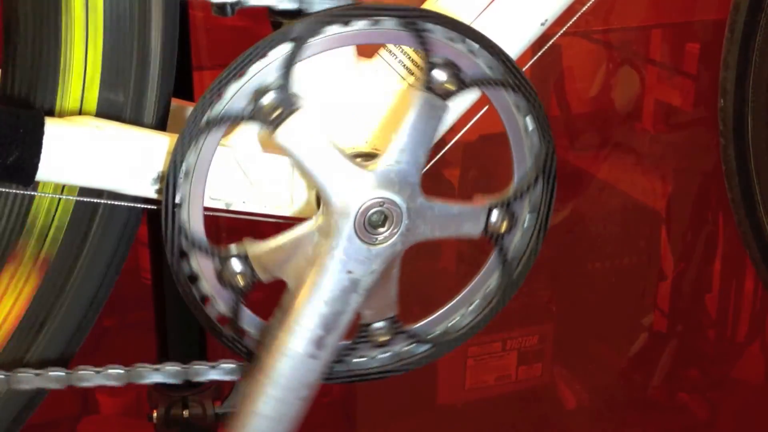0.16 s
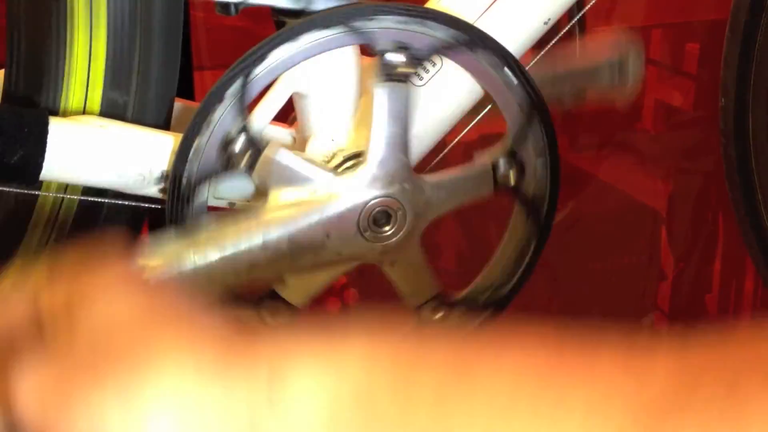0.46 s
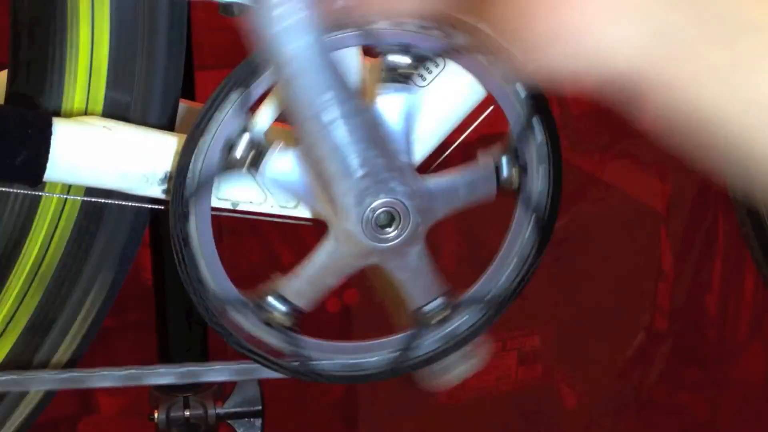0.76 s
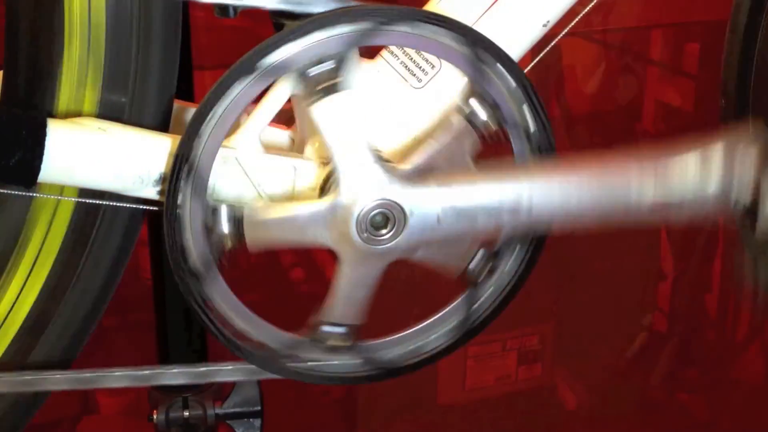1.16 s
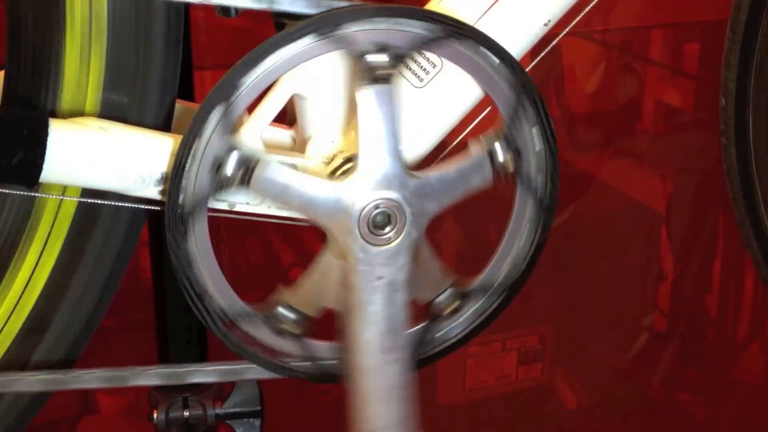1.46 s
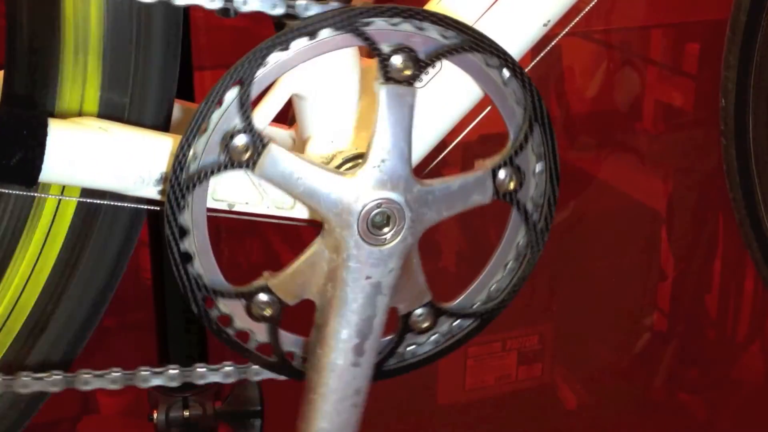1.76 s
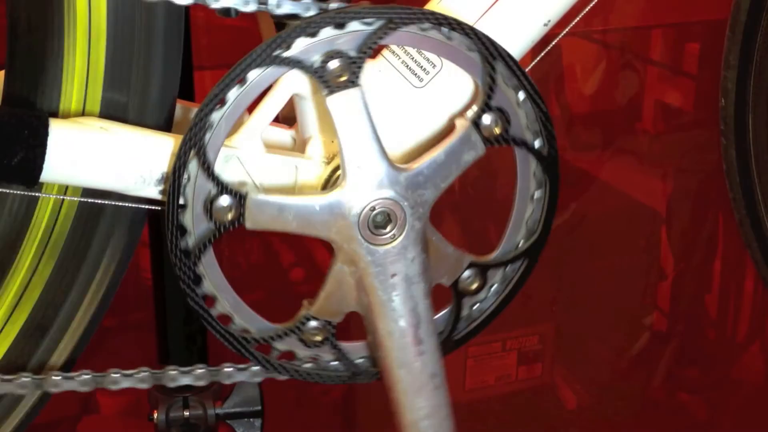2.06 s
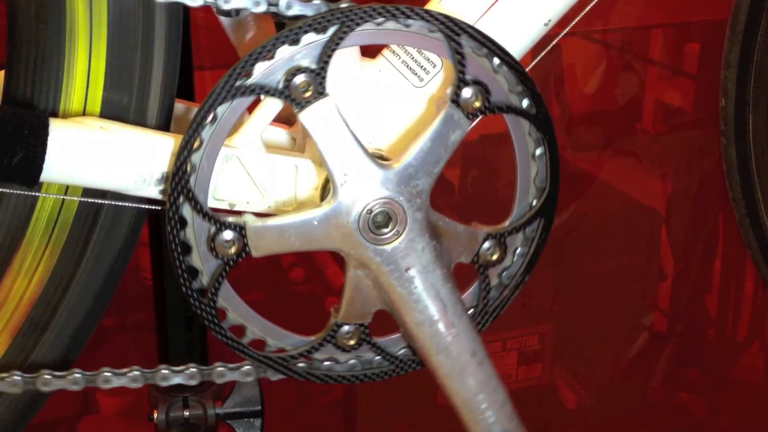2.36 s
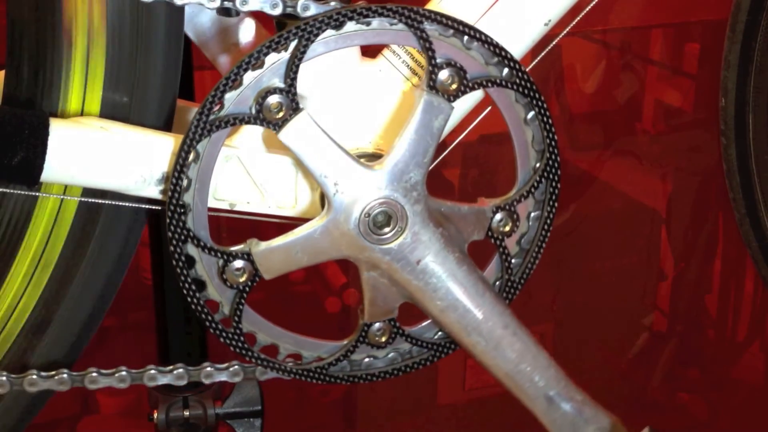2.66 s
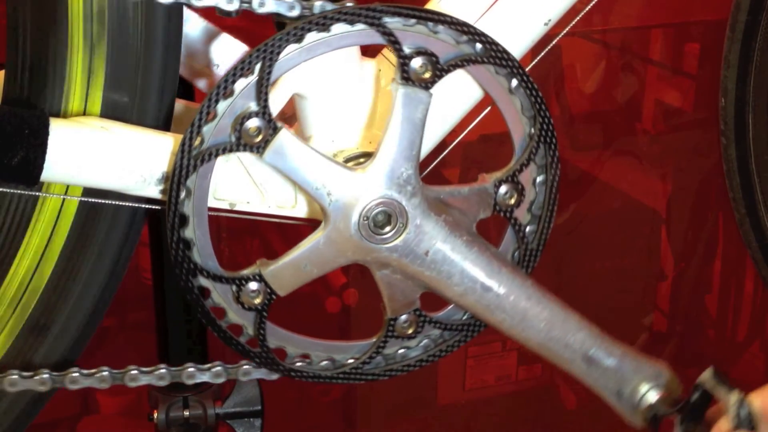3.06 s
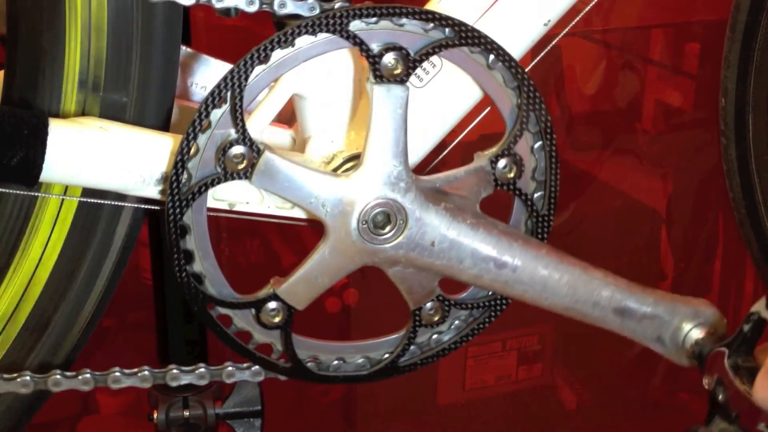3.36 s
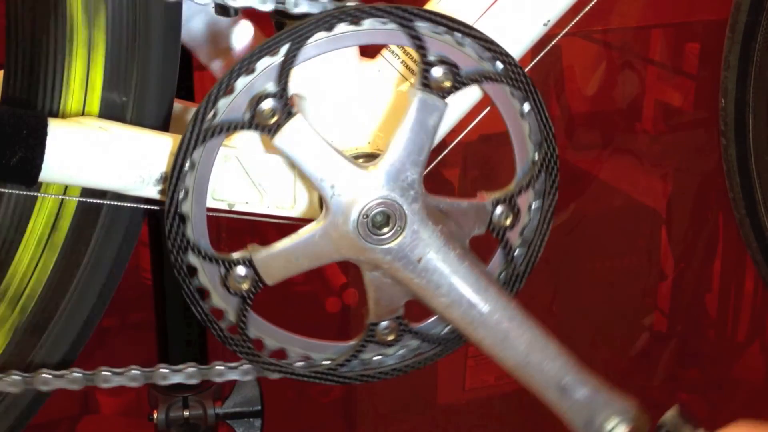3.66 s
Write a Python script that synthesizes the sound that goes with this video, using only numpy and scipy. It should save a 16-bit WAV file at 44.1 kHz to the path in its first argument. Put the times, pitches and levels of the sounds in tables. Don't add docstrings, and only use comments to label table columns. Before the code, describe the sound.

A bicycle freewheel clicks crisply: first a hand turns the crank with soft chain hiss and small ticks, then the coasting wheel's ratchet clicks steadily, slows and stops. Close microphone, small room, faint ventilation rumble.

```python
import sys
import numpy as np
from scipy import signal
from scipy.fft import rfft, irfft
from scipy.io import wavfile
from scipy.ndimage import uniform_filter1d, map_coordinates

SR = 44100
rng = np.random.default_rng(int(sys.argv[2]) if len(sys.argv) > 2 else 0)


def attenuation_scalar(level_db):
    decades = np.asarray(level_db, float) / 20
    return 10 ** decades


def generate_wav(sig):
    pcm = np.round(np.clip(np.atleast_2d(sig).T, -1, 1) * 32767).astype(np.int16)
    wavfile.write(sys.argv[1], SR, pcm)


N = 167580


def unit(x):
    return x / np.sqrt(np.mean(x ** 2, -1, keepdims=True) + 1e-20)


def along(points, hz):
    f, v = np.transpose(points)
    return np.interp(np.log(hz + 1), np.log(f + 1), v)


def noise(spectrum, rows, size, scatter_db=0):
    hz = np.fft.rfftfreq(size, 1 / SR)
    humps = rng.standard_normal((rows, len(hz)))
    humps = unit(uniform_filter1d(humps, size=len(hz) // 30, axis=1))
    gain = attenuation_scalar(along(spectrum, hz) + scatter_db * humps)
    return unit(irfft(rfft(rng.standard_normal((rows, size))) * gain, size))


def narrow(hz, width_hz):
    offset = (np.fft.rfftfreq(N, 1 / SR) - hz) / width_hz * 2
    return unit(irfft(rfft(rng.standard_normal(N)) / (1 + offset ** 2), N))


def wobble(rate_hz):
    knots = rng.standard_normal(int(N * rate_hz / SR) + 4)
    return map_coordinates(knots, [np.arange(N) * rate_hz / SR])


def lumps(shape, depth_db, size):
    return attenuation_scalar(depth_db * unit(uniform_filter1d(rng.standard_normal(shape), size=size, axis=-1)))


def place(times, sounds):
    at = np.round(np.asarray(times) * SR).astype(int)[:, None] + np.arange(sounds.shape[1])
    return np.bincount(at.ravel(), sounds.ravel(), N + SR)[:N]


CHATTER_DB, SNAP_RISE_S = 3.5, 0.0012


def bursts(spectrum, rows, t60, colour_db):
    t = np.arange(2048) / SR
    grit = noise(spectrum, rows, size=2048, scatter_db=colour_db)
    grit = unit(grit * lumps((rows, 2048), CHATTER_DB, size=30))
    return grit * attenuation_scalar(-60 * t / t60) * (1 - np.exp(-t / SNAP_RISE_S))


# f/Hz, width/Hz, level/dB
FAN_TONES = [(118.7, 8.2, -66), (175, 106, -61.5), (380.7, 4.8, -62.5)]
# f/Hz, level/dB
RUMBLE_SPECTRUM = [(60, -65), (85, -81), (110, -13), (194, 3), (350, -2), (420, -6.5), (700, -25.5),
                   (1000, -78)]
# f/Hz, level/dB
HISS_SPECTRUM = [(300, -6), (500, -1.5), (900, -4.5), (3100, -15), (8600, -18), (9600, -26.5), (11500, -20),
                 (15000, -20)]
RUMBLE_DB, HISS_DB = -50, -58


def room_tone():
    fan = sum(attenuation_scalar(db) * narrow(hz, width_hz) for hz, width_hz, db in FAN_TONES)
    rumble = attenuation_scalar(RUMBLE_DB + 0.8 * wobble(4.01)) * noise(RUMBLE_SPECTRUM, 1, size=N)[0]
    hiss = attenuation_scalar(HISS_DB) * noise(HISS_SPECTRUM, 1, size=N)[0]
    return fan + rumble + hiss


# t/s, length/s, level/dB, f/Hz
FRAME_SCRAPES = [
    (0.653, 0.1, -61.5, 1050),
    (0.827, 0.083, -59.5, 1400),
    (1.28, 0.029, -57, 2000),
    (1.353, 0.091, -60, 1570),
]


def scrapes():
    t = np.arange(N) / SR
    out = 0
    for s, length_s, db, hz in FRAME_SCRAPES:
        swell = np.exp(-((t - s) / length_s * 2) ** 2)
        out = out + attenuation_scalar(db) * swell * narrow(hz, 0.16 * hz)
    return out


# t/s, level/dB
EFFORT = [(0, -77), (.3, -70.5), (.64, -60), (.69, -55.5), (.95, -53.5), (1.15, -56.5), (1.35, -50.5),
          (1.46, -54), (1.51, -60)]
# f/Hz, level/dB
LINK_SPECTRUM = [(300, -57), (600, -2.5), (1400, -1.5), (3100, -8), (8800, -11), (9700, -24), (11500, -17),
                 (14700, -17)]
LINKS_PER_S, LINK_SCATTER_DB, LINK_T60_S, LINK_COLOUR_DB = 300, 8, 0.011, 4.5
LINK_DB, RUB_DB = -1, -2.5


def chain_hiss():
    s, effort_db = np.transpose(EFFORT + [(EFFORT[-1][0] + 0.054, -80)])
    times = rng.uniform(0, s[-1], int(LINKS_PER_S * s[-1]))
    sizes = attenuation_scalar(LINK_SCATTER_DB * rng.random((len(times), 1)) ** 2)
    links = place(times, sizes * bursts(LINK_SPECTRUM, len(times), LINK_T60_S, LINK_COLOUR_DB))
    links = links / np.sqrt(np.mean(links[:int(s[-1] * SR)] ** 2))
    rub = noise(LINK_SPECTRUM, 1, size=N)[0] * attenuation_scalar(0.68 * wobble(29.0))
    effort = attenuation_scalar(np.interp(np.arange(N) / SR, s, effort_db))
    return effort * (attenuation_scalar(LINK_DB) * links + attenuation_scalar(RUB_DB) * rub)


# t/s, peak/dB, f/Hz
CHAIN_TICKS = [(.1156, -37.5, 2600), (.177, -41, 2980), (0.2, -44, 3500), (.234, -55, 3000),
               (.2533, -36.5, 4760), (.31, -48, 3000), (.341, -46.5, 6100), (.358, -42, 4180),
               (.39, -37, 4540), (0.408, -41, 3000), (.4344, -45, 3500), (.449, -50, 5000),
               (.465, -45, 12000), (0.494, -44, 4500), (.519, -47, 7000), (0.533, -37.5, 5500),
               (.5965, -45, 5000), (0.613, -39, 3980), (.646, -47, 5000), (.666, -52, 7000),
               (.681, -32, 6990), (0.731, -40, 4200), (.752, -39, 3000), (.777, -39, 7500),
               (0.839, -34, 5500), (0.9018, -44, 6500), (0.93, -44, 5000), (0.9828, -29.5, 6500),
               (.994, -34, 7000), (1.037, -41, 6000), (1.048, -36, 5500), (1.076, -40, 6020),
               (1.1533, -41, 4000), (1.166, -38, 5000), (1.181, -43, 6000), (1.211, -37, 4835),
               (1.249, -43, 3000), (1.2755, -38, 6000), (1.303, -45, 6000), (1.345, -45, 6510),
               (1.396, -42, 7000), (1.41, -43, 6000)]
TICK_DB, TICK_T60_S, TICK_DB_PER_OCTAVE = -5.5, 0.018, -14
COLOUR_DB = 2.5


def chain_ticks():
    at, peak_db, tick_hz = np.transpose(CHAIN_TICKS)
    skirt_db = 3 * TICK_DB_PER_OCTAVE
    ticks = []
    for hz in tick_hz:
        peak = [(hz / 8, skirt_db), (hz, 0), (hz * 8, skirt_db)]
        ticks.append(bursts(peak, 1, TICK_T60_S, COLOUR_DB))
    return place(at, attenuation_scalar(peak_db + TICK_DB)[:, None] * np.concatenate(ticks))


# f/Hz, level/dB
SNAP_SPECTRUM = [(500, -19), (1600, -16), (2000, -8), (2800, -6.5), (5200, -9.5), (7000, 5), (10500, -3),
                 (14000, -0.5)]
SNAP_DB, SNAP_T60_S = -0.5, 0.036


def pawl_snaps(count):
    return attenuation_scalar(SNAP_DB) * bursts(SNAP_SPECTRUM, count, SNAP_T60_S, COLOUR_DB)


# f/Hz, level/dB, t60/s
WHEEL_MODES = [(917.4, -17, 0.1), (1980, -16, 0.24), (2066, -18.5, 0.16), (2710, -5, 0.074),
               (2985, -15.5, 0.19), (3300, -14, 0.039), (3710, -6.5, 0.085), (3858, -11.5, 0.14),
               (4270, -5.5, 0.039), (4645, -10, 0.11), (4820, -11.5, 0.14), (5500, -9, 0.12),
               (6770, -5, 0.043), (7265, -11.5, 0.047)]
# t/s, mode f/Hz, extra level/dB
SQUARE_HITS = [(1.546, 2710, 7), (1.598, 2710, 9.5), (1.598, 6770, -4), (1.635, 3694, 5), (1.704, 2710, 9),
               (1.704, 6770, 16), (1.736, 6770, 12), (1.77, 3720, 13), (1.77, 3858, 5), (1.832, 4270, 14),
               (1.868, 4300, 10), (1.966, 2710, 6), (1.999, 2710, 11), (1.999, 2957, 14),
               (2.034, 2710, 7.3), (2.034, 2930, 13), (2.102, 6770, 16), (2.143, 4180, 16),
               (2.263, 4820, 5), (2.305, 2710, 12.5), (2.305, 3670, 5), (2.346, 3694, 5),
               (2.387, 3670, 7.1), (2.47, 3630, 10), (2.47, 3858, 8), (2.47, 4240, 11), (2.513, 3694, 6.7),
               (2.513, 3858, 11), (2.608, 7265, 6), (2.658, 4645, 7.5), (2.658, 5500, 2), (2.813, 2066, 7),
               (2.864, 2960, 8.1), (3.02, 4250, 15), (3.02, 4645, 7.0), (3.02, 4820, 4), (3.02, 6770, 15),
               (3.174, 915, 3.5), (3.226, 2710, 12), (3.281, 7265, 5.1),
               (2.559, 1972, 8.5), (3.174, 2066, 17), (3.641, 1972, 3), (2.2, 1972, 4),
                    (1.6, 1972, 3.5), (2.4, 915, 5), (3.281, 915, 7), (2.71, 2960, 4), (2.7, 2710, 9.5),
                    (2.3, 2710, 8), (3.641, 6770, 10.5), (3.444, 3694, 5)]
RING_DB, RING_SCATTER_DB, RING_RISE_CYCLES = -17.5, 3, 3
DETUNE, RING_BLUR = 0.0043, 0.002


def wheel_ring(tooth_s):
    count = len(tooth_s)
    t = np.arange(4096) / SR
    ring = 0
    for hz, db, t60 in WHEEL_MODES:
        scatter, detune = rng.standard_normal((count, 2)).T[:, :, None]
        walk = np.cumsum(rng.standard_normal((count, 128)), axis=1)
        drift = np.repeat(walk, 32, axis=1) * np.sqrt(RING_BLUR * hz / 40)
        phase = 2 * np.pi * hz * (1 + DETUNE * detune) * t + uniform_filter1d(drift, size=64, axis=1)
        square_db = np.zeros(count)
        for at, mode_hz, extra_db in SQUARE_HITS:
            square_db += extra_db * (abs(tooth_s - at) < 0.012) * np.exp(-((hz - mode_hz) / 70) ** 2)
        level = attenuation_scalar(db + square_db[:, None] + RING_SCATTER_DB * scatter - 60 * t / t60)
        ring = ring + level * np.sin(phase) * (1 - np.exp(-t * hz / RING_RISE_CYCLES))
    fade = np.cos(np.pi / 2 * t / t[-1]) ** 0.5
    return attenuation_scalar(RING_DB) * ring * fade


# f/Hz, level/dB
WALL_SPECTRUM = [(500, -28.5), (1600, -11.5), (2800, -6.5), (5200, -9), (7000, -0.5), (9000, -4),
                 (10500, -8), (14000, -1.5)]
# f/Hz, t60/s
ROOM_T60 = [(1000, 0.55), (3000, 0.45), (7000, 0.35), (14000, 0.25)]
ROOM_DB, ROOM_RISE_S, TAIL_CHATTER_DB = -18, 0.0058, 2


def room_tails(count):
    size = 12288
    hz, u, z = signal.stft(noise(WALL_SPECTRUM, count, size=size, scatter_db=3), SR, nperseg=256)
    decay = attenuation_scalar(-60 * u / along(ROOM_T60, hz)[:, None])
    tail = signal.istft(z * decay, SR, nperseg=256)[1][:, :size]
    rise = 1 - np.exp(-np.arange(size) / SR / ROOM_RISE_S)
    return attenuation_scalar(ROOM_DB) * tail * lumps(tail.shape, TAIL_CHATTER_DB, size=90) * rise


# t/s, level/dB
RIM_LEVEL = [(1.54, -2), (1.75, 1), (2, -1), (2.2, -2.5), (2.5, -0.5), (2.8, -0.5), (3.1, -5.5), (3.3, 4),
             (3.65, -8.5)]
RIM_HZ, RIM_WIDTH_HZ = 2680, 1400
BODY_HZ = 5000
DIP_HZ, DIP_WIDTH_HZ, DIP_DB = 5200, 150, -6


def radiate(drop, times, body_db):
    hz = np.fft.rfftfreq(12800, 1 / SR)
    rim_db = np.interp(times, *np.transpose(RIM_LEVEL))[:, None]
    body = body_db[:, None] / (1 + (hz / BODY_HZ) ** 8)
    rim = rim_db * np.exp(-((hz - RIM_HZ) / RIM_WIDTH_HZ) ** 2)
    dip = DIP_DB * np.exp(-((hz - DIP_HZ) / DIP_WIDTH_HZ) ** 2)
    padded = np.pad(drop, ((0, 0), (128, 384)))
    return irfft(rfft(padded) * attenuation_scalar(body + rim + dip))


# t/s, first pawl level/dB, second pawl lag/ms, its level/dB, body
# level/dB
TEETH = [(1.5438, -24, 5.0, -21.5, 3.5), (1.5952, -26, 5.4, -18, 2), (1.635, -26, 2.9, -18, 0.5),
         (1.6691, -35, 1.7, -19.5, 3), (1.705, -28, 1.3, -18, 1.5), (1.7338, -54, 4.5, -16.5, -4),
         (1.7698, -18.5, 1.45, -31.2, -1), (1.803, -24.5, 1.82, -22, 2), (1.828, -57, 7.2, -19, -3.5),
         (1.868, -25, 3.3, -19.5, -1.5), (1.9, -23, 3.0, -22, 1.5), (1.933, -21.5, 2.4, -24.5, 0.5),
         (1.967, -19.5, 1.56, -21, 1.5), (1.997, -38, 4.75, -18.5, 1.5), (2.035, -23, 1.3, -20, 2),
         (2.069, -20, 1.64, -40, 0.5), (2.0982, -35, 6.8, -21, 1), (2.142, -25.5, 3.9, -21, -0.5),
         (2.1815, -26.5, 3.8, -22, 2.5), (2.222, -22, 4.1, -23.5, 2), (2.2627, -28, 1.1, -18, 2),
         (2.3058, -23, 1.5, -25, 3), (2.3462, -24.5, 0.93, -21, 3),
         (2.3865, -25.5, 2.66, -19.5, 1), (2.428, -19, 1.0, -38, 2.3), (2.4683, -25, 4.5, -19, 1),
              (2.5137, -22, 4.9, -20.5, -1.5), (2.559, -21, 0.92, -21.5, -1.2), (2.608, -17, 4.3, -34, -4),
              (2.6571, -53, 1.22, -16.5, -1.5), (2.7107, -19, 1.4, -34, 4), (2.7608, -21, 2.9, -22.5, -0.5),
              (2.813, -20.5, 8.2, -28, 1), (2.8645, -20, 4.7, -21, 2), (2.9146, -21, 4.9, -19.5, -0.5),
              (2.967, -23.5, 5.2, -25.5, 2), (3.0201, -18.5, 1.83, -26.5, -2.5),
              (3.073, -23.5, 1.3, -25, 4), (3.124, -17.5, 4.0, -52, 3), (3.1733, -23.5, 2.06, -20.5, 2),
              (3.2263, -20.5, 1.9, -40, 4), (3.2808, -19, 6.1, -21, -0.5), (3.349, -21.5, 8.3, -25, 1),
              (3.4441, -22, 11.5, -26.5, 2), (3.641, -19.5, 7.7, -39, 2.5)]


def freewheel():
    s, first_db, lag_ms, second_db, body_db = np.transpose(TEETH)
    times = np.r_[s, s + lag_ms / 1000]
    gain = attenuation_scalar(np.r_[first_db, second_db])[:, None]
    drop = room_tails(len(times))
    drop[:, :4096] += wheel_ring(np.tile(s, 2))
    drop[:, :2048] += pawl_snaps(len(times))
    drop = radiate(drop, times, np.tile(body_db, 2))
    return place(times - 128 / SR, gain * drop)


def scene():
    return (room_tone() + scrapes() + chain_hiss() + chain_ticks() + freewheel())[None]


def band_limit(x):
    return signal.sosfilt(signal.butter(12, 16470, fs=SR, output="sos"), x)


LOW_HZ, TOP_HZ, TOP_DB = 92, 15330, -44


def record(dry):
    hz = np.fft.rfftfreq(N, 1 / SR)
    top_db = TOP_DB / (1 + np.exp((TOP_HZ - hz) / 50)) - 0.011 * np.maximum(hz - TOP_HZ, 0)
    low_cut = 1 / np.sqrt(1 + (LOW_HZ / (hz + 1)) ** 6)
    mix = irfft(rfft(dry) * attenuation_scalar(top_db) * low_cut, N)
    return band_limit(mix)


dry = scene()
out = record(dry)
generate_wav(out)
```